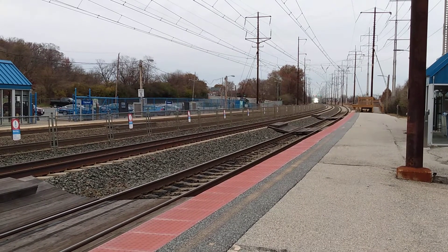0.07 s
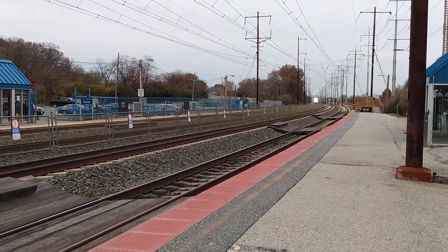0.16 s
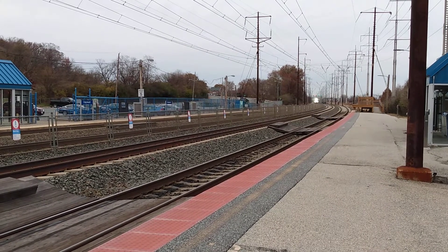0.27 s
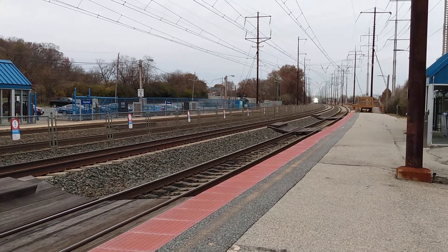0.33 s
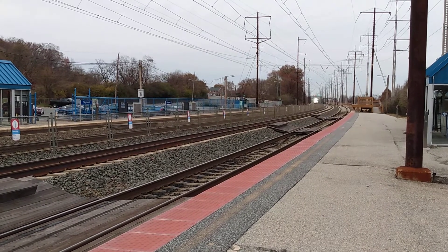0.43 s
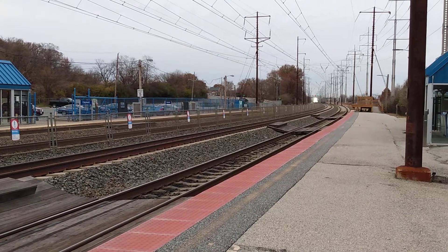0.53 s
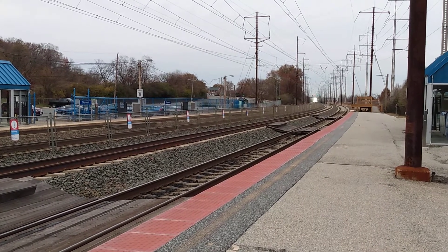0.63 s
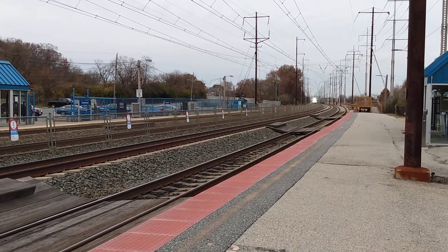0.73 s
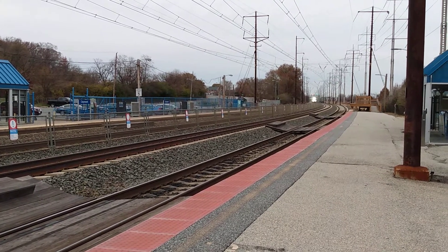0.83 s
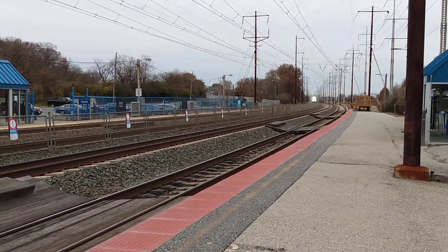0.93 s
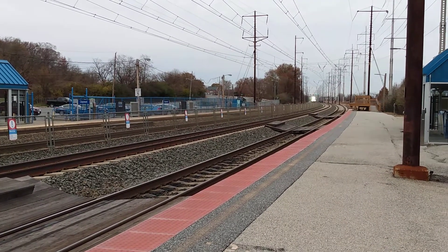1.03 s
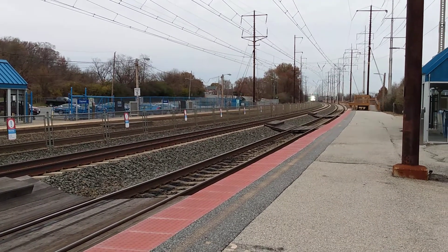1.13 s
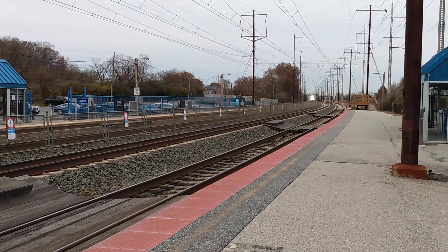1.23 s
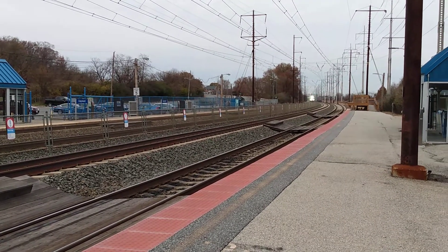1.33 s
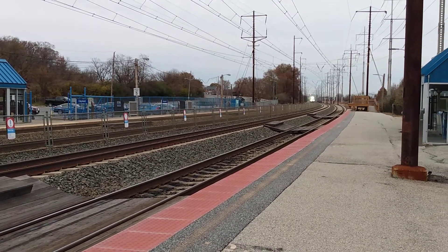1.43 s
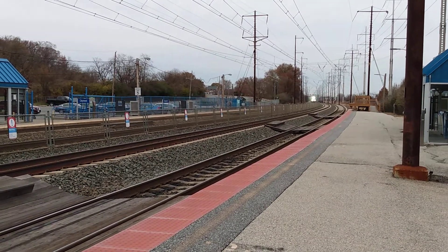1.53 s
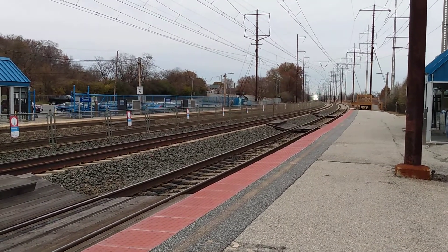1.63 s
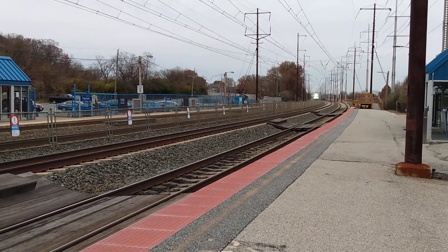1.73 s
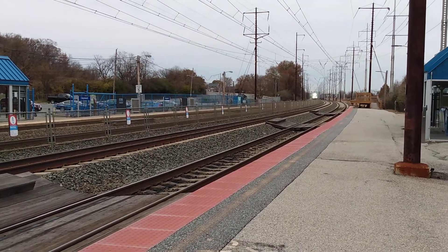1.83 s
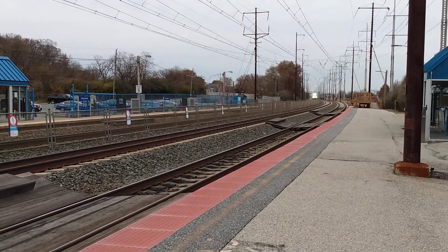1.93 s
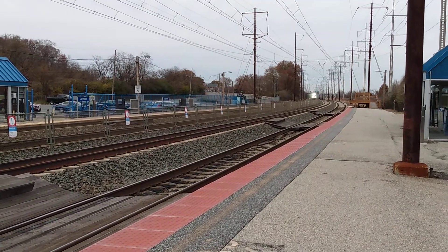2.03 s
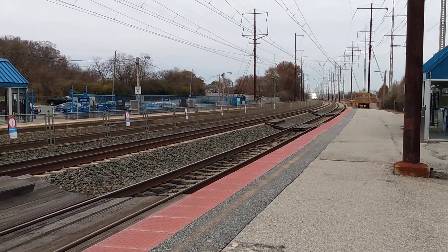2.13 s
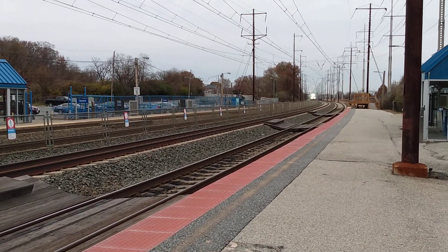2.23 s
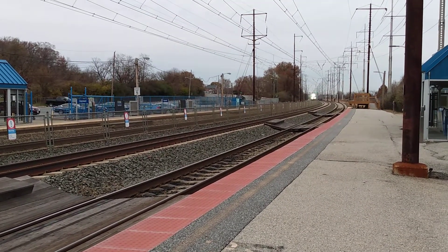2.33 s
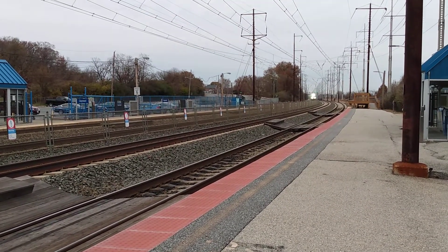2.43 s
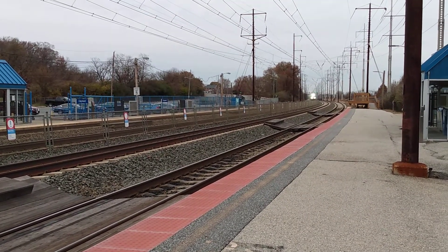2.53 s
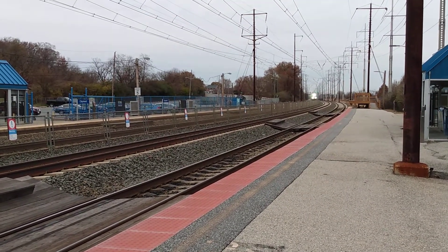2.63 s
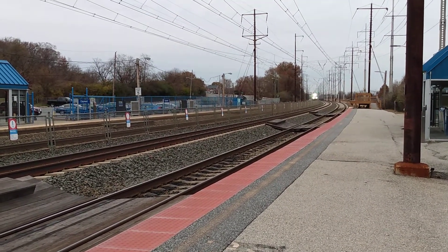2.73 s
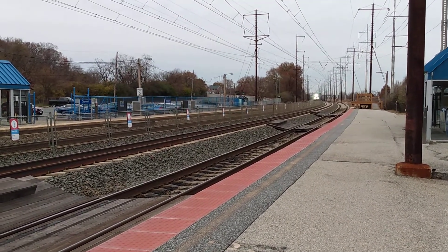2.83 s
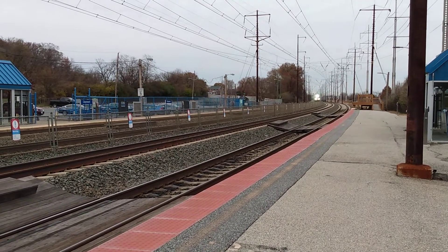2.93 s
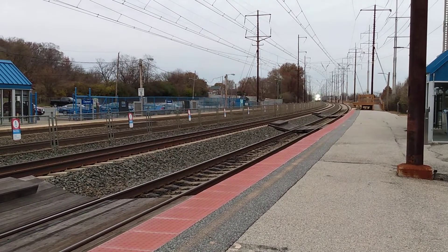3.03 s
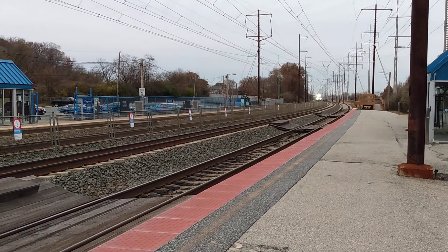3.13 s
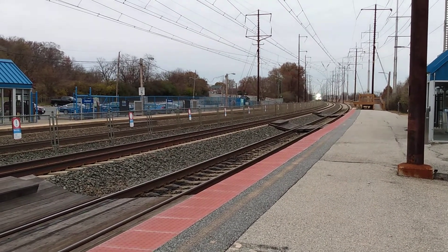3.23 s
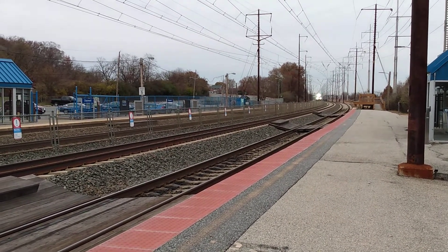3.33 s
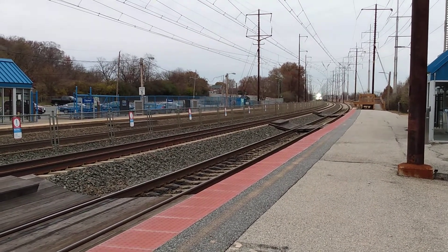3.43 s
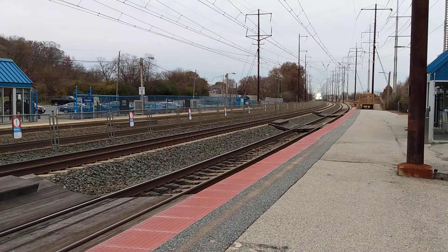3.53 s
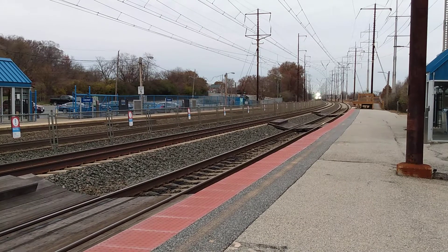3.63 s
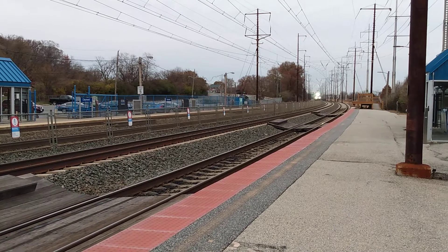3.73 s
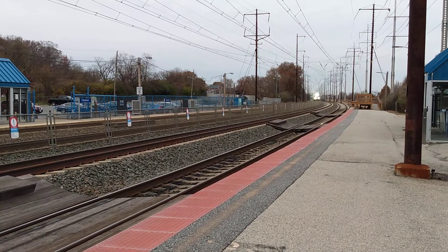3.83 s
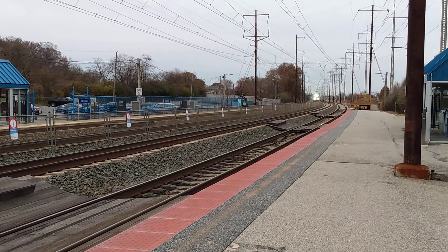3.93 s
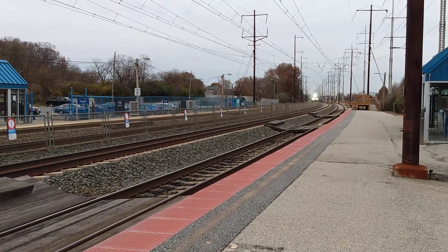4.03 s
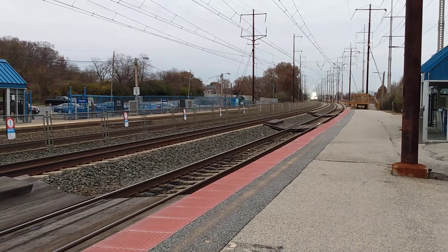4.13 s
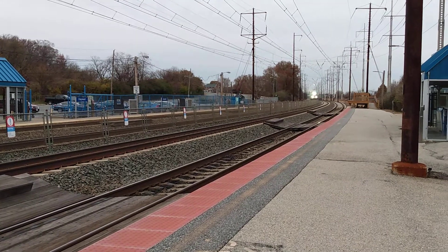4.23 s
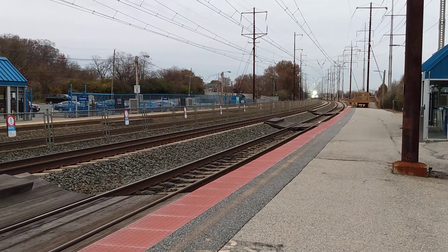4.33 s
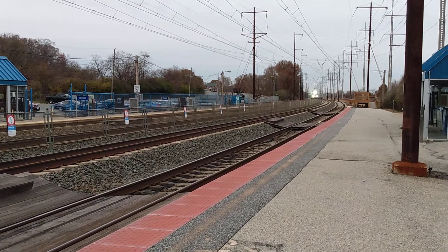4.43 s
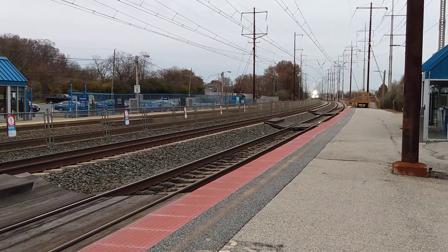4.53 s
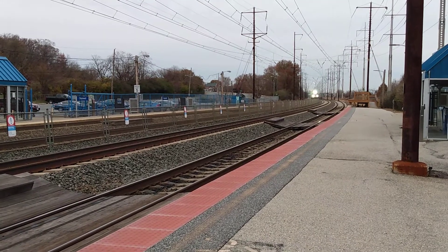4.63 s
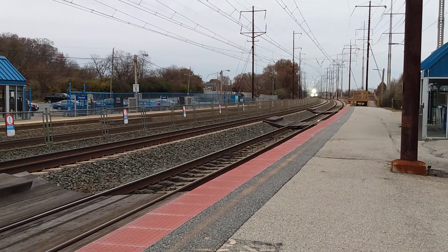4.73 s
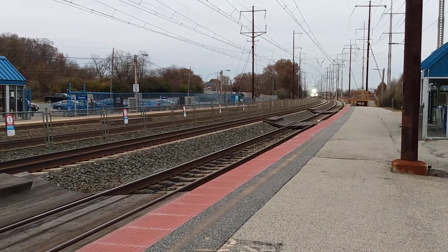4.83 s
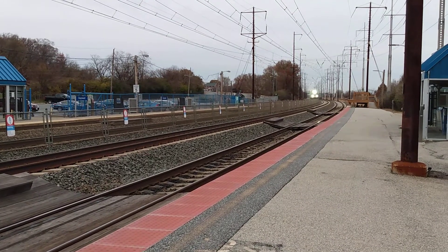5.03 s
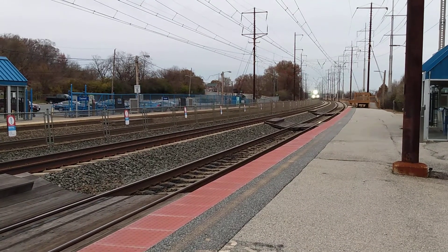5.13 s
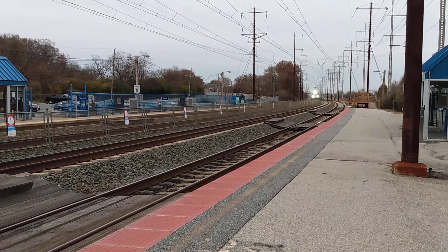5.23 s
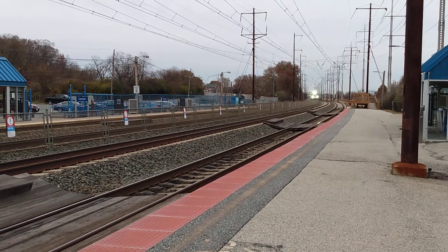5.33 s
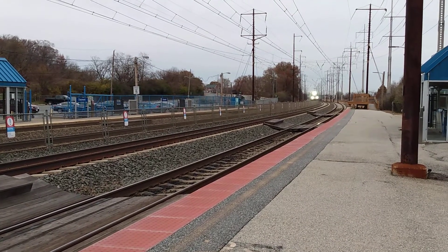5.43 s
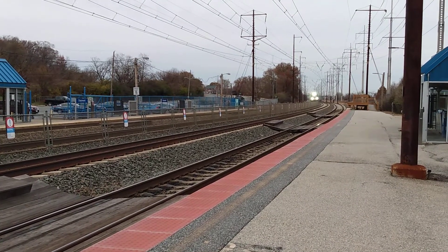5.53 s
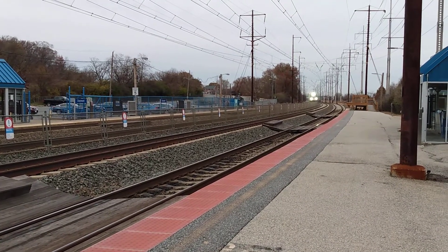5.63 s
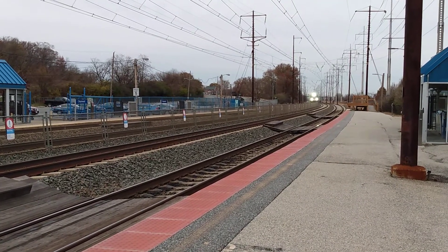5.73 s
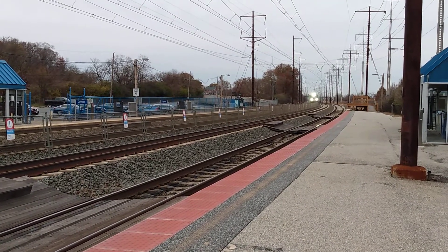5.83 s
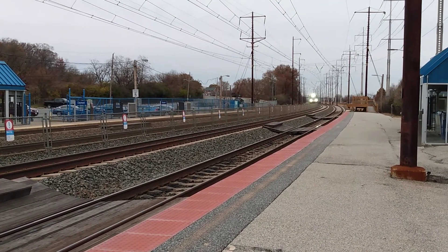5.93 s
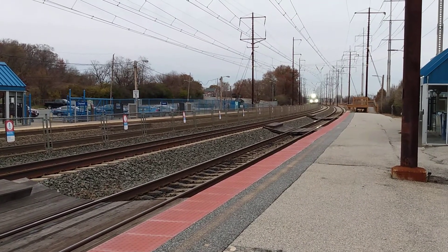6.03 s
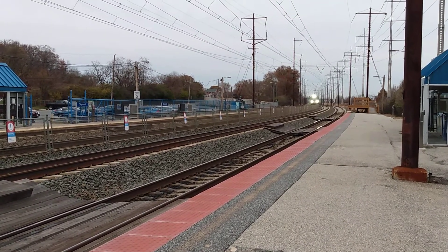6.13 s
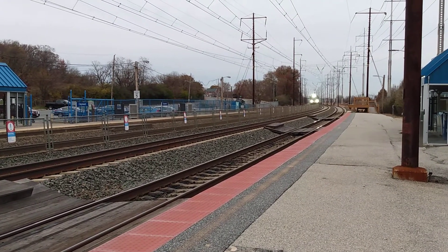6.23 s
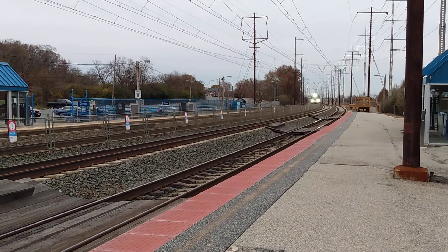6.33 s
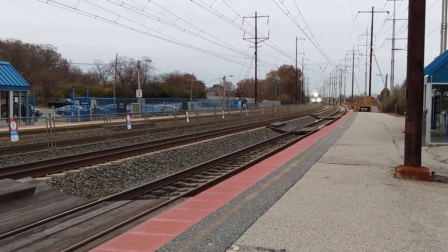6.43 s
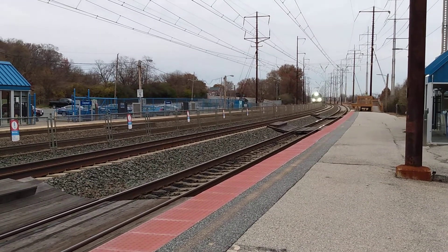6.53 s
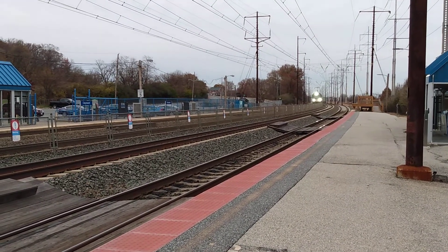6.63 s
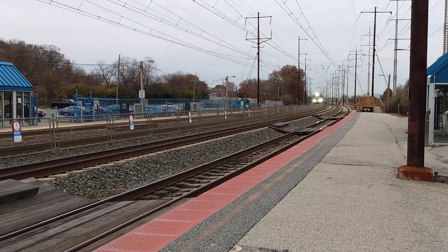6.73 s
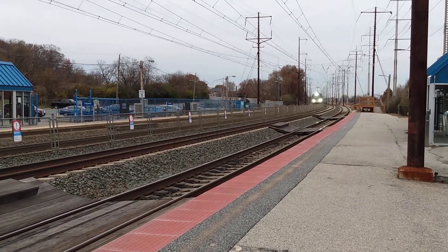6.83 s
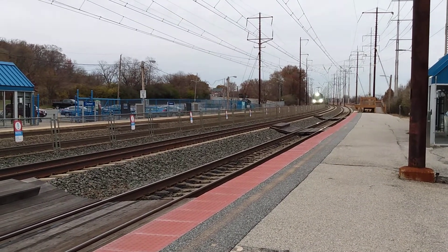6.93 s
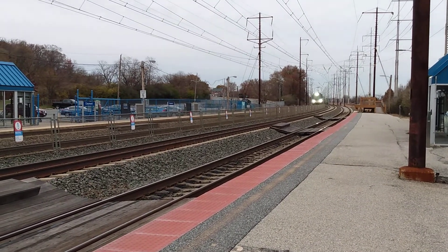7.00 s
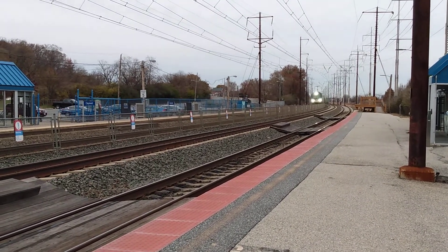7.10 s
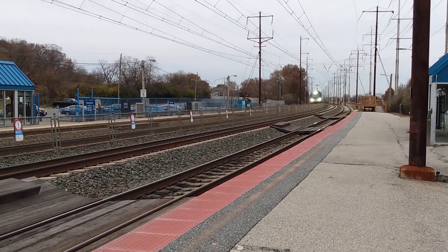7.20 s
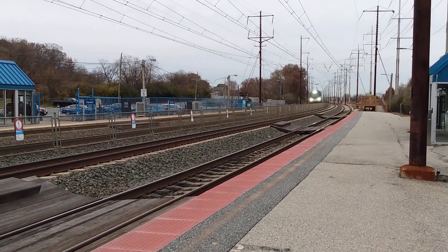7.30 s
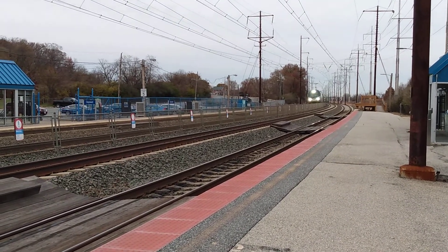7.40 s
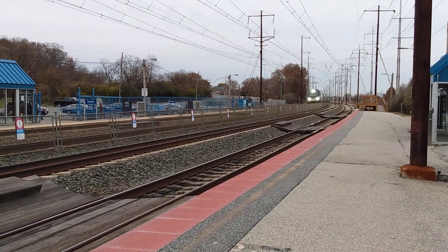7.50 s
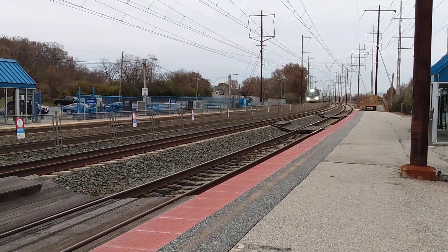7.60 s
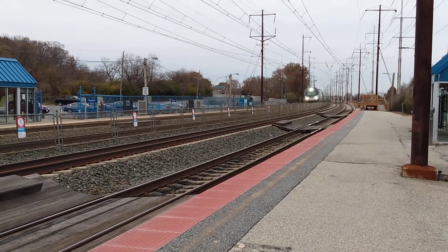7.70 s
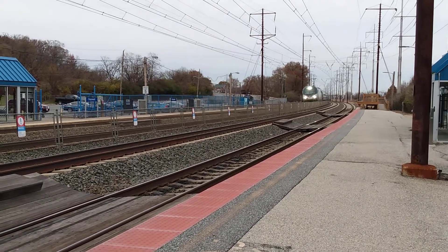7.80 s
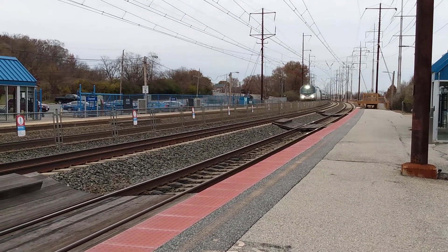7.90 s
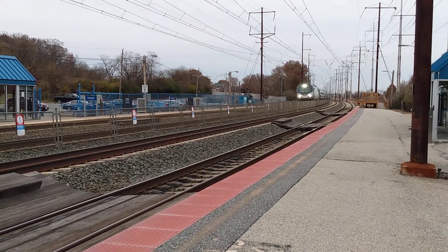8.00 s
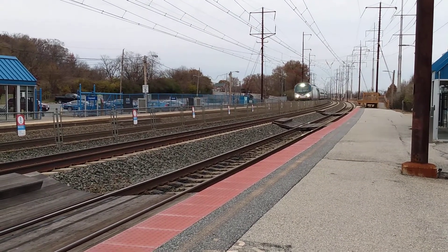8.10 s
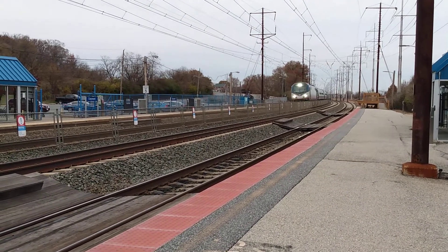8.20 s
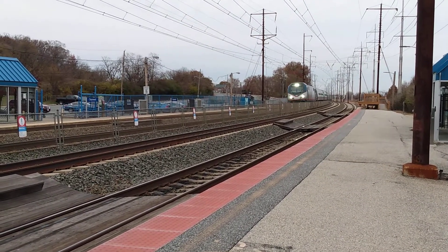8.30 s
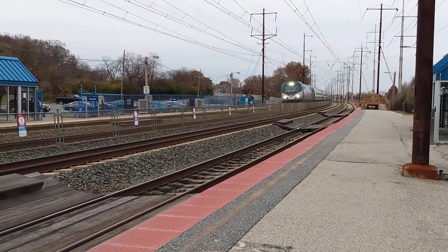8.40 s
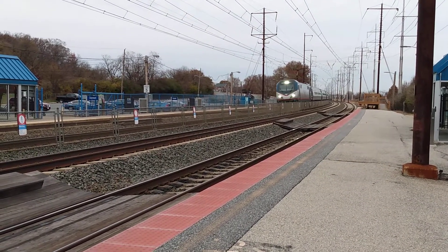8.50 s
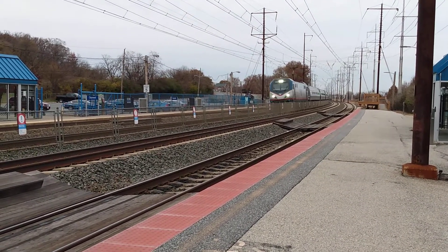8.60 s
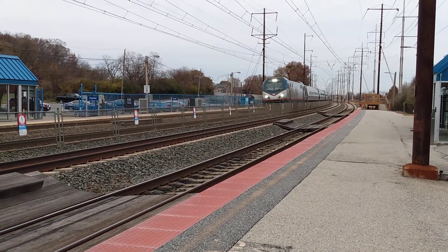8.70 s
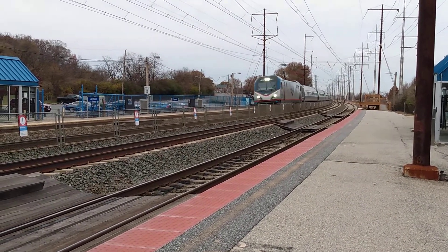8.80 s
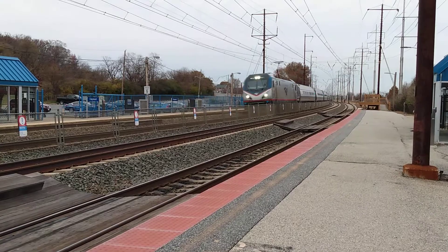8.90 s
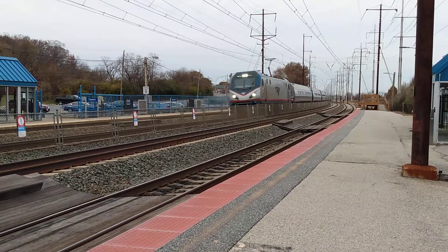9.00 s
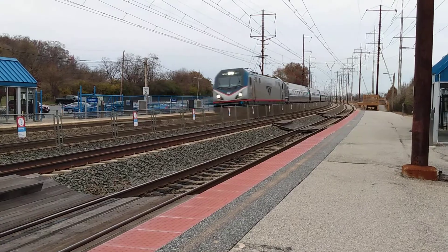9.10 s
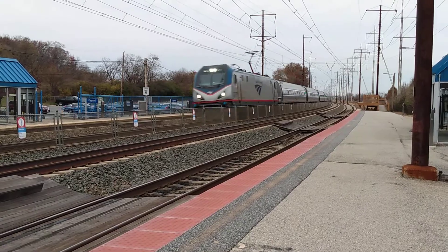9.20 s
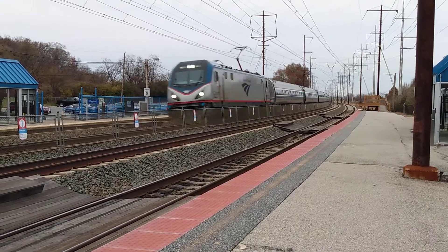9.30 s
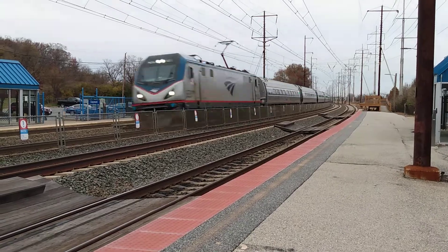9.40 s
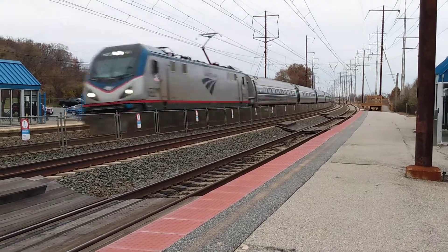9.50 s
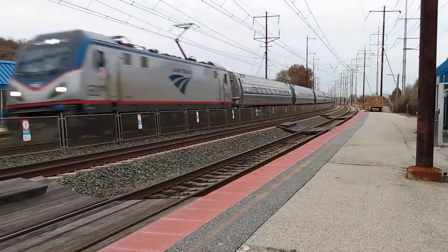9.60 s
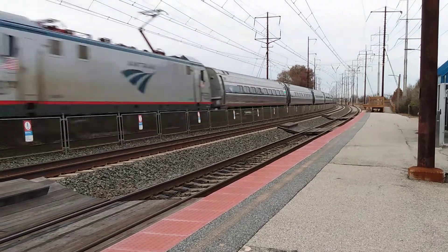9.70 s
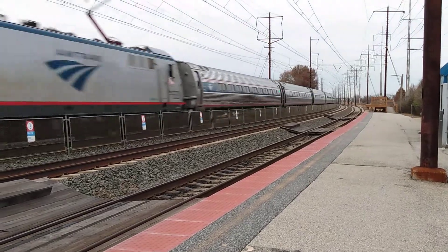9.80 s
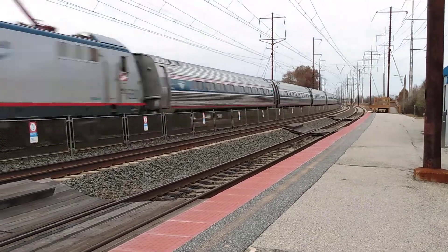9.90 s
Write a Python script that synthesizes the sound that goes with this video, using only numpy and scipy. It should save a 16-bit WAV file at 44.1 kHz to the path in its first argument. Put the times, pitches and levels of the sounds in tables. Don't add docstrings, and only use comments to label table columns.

```python
import sys
import numpy as np
from scipy import signal
from scipy.io import wavfile
from scipy.ndimage import uniform_filter1d

SR = 44100
rng = np.random.default_rng(int(sys.argv[2]) if len(sys.argv) > 2 else 0)


def makeup_ratio(level_db):
    decades = np.asarray(level_db, float) / 20
    return 10 ** decades


def materialize(psi):
    bounded = np.clip(np.atleast_2d(psi).T, -1, 1)
    quanta = np.round(bounded * 32767).astype(np.int16)
    wavfile.write(sys.argv[1], SR, quanta)


N = 438794


def on_hz(table, hz):
    at_hz, *columns = np.transpose(table)
    return np.array([np.interp(np.log(hz + 1), np.log(at_hz + 1), c) for c in columns])


def ramp(hz, edges_hz, values):
    return np.interp(np.log(hz + 1), np.log(edges_hz), values)[:, None]


def bump(t, s, half_s):
    return np.exp(-((t - s) / half_s) ** 2)


def frames(x, size=1024):
    return signal.stft(x, SR, nperseg=size, noverlap=size - size // 4)


def unframe(cells, size=1024):
    return signal.istft(cells, SR, nperseg=size, noverlap=size - size // 4)[1][..., :N]


def walk(shape, wide, long):
    w = rng.standard_normal(shape, dtype=np.float32)
    for _ in range(2):
        w = uniform_filter1d(w, wide, axis=0)
        w = uniform_filter1d(w, long, axis=1)
    return w / w.std()


# hz, traffic_0_to_1, wheels_0_to_1, sizzle_0_to_1
PORTS_ALIKE = [(60, .99, .997, .6), (300, .88, .98, .6), (800, .5, .84, .6), (1500, .35, .65, .6),
               (4000, .15, .3, .5), (14000, .3, .45, .6)]


def noise_source(spectrum, phase, share, patchy_db, burst_db=0., even_hz=SR):
    noise = rng.standard_normal((3, N), dtype=np.float32) * np.float32(np.sqrt(SR / 2))
    hz, t, cells = frames(noise)
    patchy_db = patchy_db * np.where(hz > even_hz, .4, 1)[:, None]
    db = patchy_db * walk(cells[0].shape, wide=5, long=9)
    db = db + burst_db * walk((1, len(t)), wide=1, long=5)
    alike = np.clip(on_hz(PORTS_ALIKE, hz)[share], 0, 1)[:, None]
    turn = np.exp(.5j * np.interp(hz, *np.transpose(phase)))[:, None]
    common = np.sqrt(alike) * np.array([cells[0] * turn, cells[0] / turn])
    ports = common + np.sqrt(1 - alike) * cells[1:]
    return hz, t, ports * makeup_ratio(db + on_hz(spectrum, hz)[:, :, None])


# hz, left_db_per_hz, right_db_per_hz
TRAFFIC = [(30, -82, -84.5), (80, -86, -83.5), (200, -81.5, -82.5), (440, -87, -87.5), (770, -72.5, -79.5),
           (1030, -71.5, -85), (1254, -85, -75), (1790, -87, -69), (2403, -81, -79.5), (2930, -106, -86.5),
           (4620, -101, -89.5), (6050, -104, -99), (7640, -104, -104), (10100, -107, -116)]
# hz, left_lead_radians
TRAFFIC_PHASE = [(0, 0), (1030, 1.9), (1810, 3.8), (2760, 7.9), (4910, 19.9), (6550, 26.7), (7670, 25.6),
                 (8270, 22.8), (11100, 40.2), (11500, 40.5), (12300, 44.9), (13700, 48.0), (15600, 53.7),
                 (16100, 54.1)]
# time_s, level_db
TRAFFIC_FLOW = [
    (0, 0.8),
    (2.1, 1),
    (2.6, -0.24),
    (4.5, -0.4),
    (6.1, 1),
    (7.2, 3),
]
# centre_s, half_length_s, tyre_db, engine_bass_db
PASSING_CARS = [
    (0.898, .15, 2, 2.5),
    (1.25, 0.22, 0, 3),
    (2.045, 0.36, 4, 1),
    (2.9, 0.21, 2, 3),
    (3.793, 0.067, 5.5, 0.2),
    (4.15, 0.057, 4.5, 2),
    (4.837, 0.1, 1.5, 2),
    (5.145, 0.13, 3.5, 1.5),
    (5.7, 0.19, 4.5, 1),
    (6.5, 0.27, -1.5, 6),
]
# centre_s, half_length_s, pitch_hz, half_width_hz, level_db
VEHICLES = [
    (0.21, 0.56, 404, 180, 6.5),
    (1.448, 0.2, 397, 116.6, 5.5),
    (1.798, .05, 1240, 100, 8.5),
    (2.0, 0.099, 1300, 250, 6.5),
    (2.642, 0.073, 273, 69, 8.5),
    (3.05, 0.26, 1250, 200, 4),
    (3.856, 0.14, 900, 120, 2),
    (6.03, 0.23, 300, 130, 5),
    (6.65, 0.27, 620, 110, 7),
    (6.096, 2.7, 2630, 820, 4),
]


def town():
    hz, t, hum = noise_source(TRAFFIC, TRAFFIC_PHASE, share=0, patchy_db=1.6, even_hz=1600)
    tyre_rest_db, tyre_hz = -2, (65, 750, 1500)
    tyre_db = tyre_rest_db + sum(tyre * bump(t, s, half_s) for s, half_s, tyre, _ in PASSING_CARS)
    engine_db = sum(bass * bump(t, s, half_s) for s, half_s, _, bass in PASSING_CARS)
    cars_db = ramp(hz, tyre_hz, [0, 1, 0]) * tyre_db + ramp(hz, tyre_hz, [1, 0, 0]) * engine_db
    breeze_db, breeze_hz, dies_s, fade_s = 9, (1570, 8950), 3.12, 1
    wind_db = -breeze_db / 2 * ramp(hz, breeze_hz, [0, 1]) * np.tanh((t - dies_s) / fade_s)
    vehicles_db = sum(db * np.outer(np.exp(-((hz - pitch_hz) / width_hz) ** 2), bump(t, s, half_s))
                      for s, half_s, pitch_hz, width_hz, db in VEHICLES)
    flow_db = np.interp(t, *np.transpose(TRAFFIC_FLOW))
    return hum * makeup_ratio(flow_db + cars_db + wind_db + vehicles_db)


# start_s, peak_db, top_hz, left_minus_right_db
BIRD_CHIPS = [
    (1.8233, -52, 6980, -9.5),
    (2.8494, -64, 7120, -11.0),
    (4.8519, -51, 7000, -3.5),
    (6.4752, -53, 7070, -4.5),
]


def bird():
    out, t = np.zeros((2, N)), np.arange(SR // 3) / SR
    tail = rng.standard_normal((2, len(t))) * makeup_ratio(-60 * t / 0.29) * makeup_ratio(-17.5)
    tail[:, 0] = 1
    for s, db, top_hz, pan_db in BIRD_CHIPS:
        hz = top_hz * (1.06 - .26 * np.exp(-t / .009))
        rasp = 1 + 3.5 * uniform_filter1d(rng.standard_normal(len(t)), size=20)
        envelope = (1 - np.exp(-t / .002)) * np.exp(-t / .022)
        chip = rasp * np.sin(2 * np.pi * np.cumsum(hz) / SR) * envelope
        heard = signal.fftconvolve(chip[None], tail, axes=1)[:, :len(t)]
        i = int((s - .004) * SR)
        out[:, i:i + len(t)] += heard * makeup_ratio(db - 11.0 + np.array([[pan_db], [-pan_db]]) / 2)
    return out


# start_s, peak_db, left_minus_right_db
FITTING_TICKS = [
    (5.579, -45, -3),
    (7.876, -24.5, -3),
]


def ticks():
    out, t = np.zeros((2, N)), np.arange(SR // 30) / SR
    bright = signal.butter(2, [2500, 8500], "band", fs=SR, output="sos")
    for s, db, pan_db in FITTING_TICKS:
        click = signal.sosfilt(bright, rng.standard_normal(len(t)) * np.exp(-t / 0.0038))
        i = int(s * SR)
        out[:, i:i + len(t)] += click * makeup_ratio(db - 4.0 + np.array([[pan_db], [-pan_db]]) / 2)
    return out


# hz, left_db_per_hz, right_db_per_hz
RAIL_SIZZLE = [(5940, -86, -90), (7900, -90.5, -84.5), (9430, -73.5, -80.5), (10370, -70.5, -71.5),
               (11120, -68.5, -72.5), (12750, -65, -63), (13500, -65, -64), (14200, -69, -62.5),
               (15000, -68, -67.5), (15800, -88, -68)]
# hz, left_lead_radians
RAIL_SIZZLE_PHASE = [(0, 0), (690, -0.5), (2670, -7.2), (3880, -0.5), (4390, -2.6), (5770, -1.5),
                     (6460, -3.0), (7490, 3.2), (8440, 1.2), (9130, 3.6), (10800, 8.7), (13700, 16.1),
                     (15400, 22.1), (16100, 22.2)]
# time_s, level_db
SIZZLE_RISE = [(0, -75), (2.0, -68), (3.1, -65), (4.6, -63), (5.8, -54), (6.5, -51.5), (7.4, -42.5),
               (8.0, -32.5), (8.7, -33.5), (9.5, -30), (9.8, -34.5), (9.95, -43)]
# start_s, hold_s, level_db
SIZZLE_BURSTS = [(0, .08, 7), (.38, .06, 8), (0.632, .03, 7), (.88, .14, 8), (1.196, 0.097, 9),
                 (2.27, 0.64, 5), (3.274, 0.44, 8.5), (3.933, 0.58, 7.5), (4.7, .25, 11.5), (5.22, .04, 4),
                 (5.36, 0.25, 6.5), (6.113, 0.14, 8), (6.57, .03, 0), (6.844, 0.091, 4.5), (7.122, 0.15, 4),
                 (7.6, 0.13, 4), (7.86, 0.31, 3.5), (8.287, 0.02, 5), (8.414, 0.051, 0.5),
                 (8.776, 0.36, 2.5), (9.136, 0.066, 2), (9.35, 0.024, 1), (9.487, 0.054, 1.5)]


def sizzle():
    hz, t, hiss = noise_source(RAIL_SIZZLE, RAIL_SIZZLE_PHASE, share=2, patchy_db=2.5, burst_db=1.4)
    growth_db = np.interp(t, *np.transpose(SIZZLE_RISE)) + 31
    burst_db, attack_s, release_s = 0, 0.027, 0.066
    for s, hold_s, db in SIZZLE_BURSTS:
        slope_s = np.where(t < s, attack_s, release_s)
        burst_db = burst_db + db * bump(t, np.clip(t, s, s + hold_s), slope_s)
    edge_hz = (10050, 13670)
    db = ramp(hz, edge_hz, [1.255, 1]) * growth_db + ramp(hz, edge_hz, [0.38, 1]) * burst_db
    low_cut_db = 30 * np.log2(np.maximum(6000 / (hz[:, None] + 50), 1))
    return hiss * makeup_ratio(db - low_cut_db)


# hz, left_db_per_hz, right_db_per_hz
WHEEL_ROAR = [(30, -55, -72), (82, -52.5, -51.5), (180, -48.5, -49), (430, -58.5, -57.5),
              (634, -47.5, -47.5), (1087, -51.5, -49.5), (1591, -44, -37.5), (1923, -55, -47.5),
              (2320, -56, -58), (2780, -57, -60), (3530, -61.5, -54), (5000, -66.5, -57.5),
              (6400, -65.5, -64.5), (9600, -65.5, -70)]
# hz, left_lead_radians
WHEEL_PHASE = [(0, 0), (1100, .3), (1460, 2.7), (2240, 4.5), (3000, 8), (8000, 17), (16000, 35)]
# pitch_hz, width_hz, far_db, near_db
WHEEL_RINGS = [(86, 14, 4.5, 6.5), (186, 39, -1, 6), (300, 130, 7, 4.5), (366, 42, 8.5, 8),
               (698, 31, 2, 3.5), (1432, 62, 8, -0.5), (1480, 88, 1.5, 3.5), (1760, 350, -3, 0.4),
               (2640, 490, 6, 0), (3060, 83, -3, 6.5), (3280, 360, -4.5, -1), (4600, 510, -0.5, 4.5)]
# hz, ground_db_per_100_m, bend_db_per_100_m
WAY_LOSS = [(200, 10, 68), (750, 8, 22), (1430, 4.5, -1), (2500, 9, 7.5)]
# centre_s, level_db
JOINT_THUDS = [
    (7.3, -1),
    (7.52, 1),
    (7.8, 1.5),
    (8.21, 8.5),
    (8.8, 5),
    (9.04, -2),
    (9.38, 2.5),
    (9.62, 4),
]


def wheels():
    hz, t, roar = noise_source(WHEEL_ROAR, WHEEL_PHASE, share=1, patchy_db=0.4, burst_db=0.62)
    speed_m_s, arrives_s, track_m = 46.03, 9.506, 13.06
    metres = np.hypot(speed_m_s * np.maximum(arrives_s - t, 0), track_m)
    ground_db, bend_db = on_hz(WAY_LOSS, hz)[:, :, None] / 100
    loss_db = 21 * np.log10(metres / track_m)
    loss_db = loss_db + ground_db * (metres - track_m)
    loss_db = loss_db + bend_db * np.maximum(metres - 101.3, 0)
    loss_db = loss_db + 41 / 100 * np.maximum(metres - 200, 0)
    thud_db = ramp(hz, (200, 590), [1, 0]) * sum(db * bump(t, s, 0.032) for s, db in JOINT_THUDS)
    near = np.interp(t, [8.3, 9.2], [0, 1])
    rings_db = sum(np.outer(1 / (1 + (2 * (hz - pitch_hz) / width_hz) ** 2), far_db + near * (near_db - far_db))
                   for pitch_hz, width_hz, far_db, near_db in WHEEL_RINGS)
    air_db = -7 * np.log2(np.maximum(hz[:, None] / 9500, 1))
    return roar * makeup_ratio(rings_db + thud_db - loss_db + air_db - 1.4)


def scene():
    return unframe(town() + wheels() + sizzle()) + bird() + ticks()


def patch_db(cells, hz, wide, long):
    power = uniform_filter1d(np.abs(cells) ** 2, long, axis=2)
    power = uniform_filter1d(power, wide, axis=1)
    return 10 * np.log10(power * 2 / (1.5 * hz[1]) + 1e-20)


def under(db, threshold_db, knee_db):
    return .5 - .5 * np.tanh((db - threshold_db) / knee_db)


def roll_off(x):
    return signal.sosfilt(signal.butter(12, 16530, fs=SR, output="sos"), x)


# hz, left_threshold_over_traffic_db, right_threshold_over_traffic_db, depth_db
NOISE_GATE = [(30, -20, -23, 8.1), (130, 5, 5.5, 9.7), (250, 6.5, 6, 12.7), (452, 7, 5.5, 15),
              (865, 1, 7.5, 9.4), (1040, -5, 8, 12), (1073, 2.5, 6, 9.8), (1384, 12.5, 8, 18.2),
              (1618, 11.5, 1, 8.9), (1950, 1.5, -37, 34), (2480, 8.5, 3.5, 5.7), (3000, 0, -14, 20)]
# hz, threshold_db
FAINT_LIMIT = [(1500, -53), (3000, -39), (6000, -28.5), (9000, -30.5), (11000, -26), (12500, -31),
               (16000, -38)]


def record(dry):
    rounded = dry / (1 + (dry / 1.02) ** 8) ** (1 / 8)
    hz, t, cells = frames(rounded.astype(np.float32))
    left_db, right_db, depth_db = on_hz(NOISE_GATE, hz)
    threshold_db = on_hz(TRAFFIC, hz) + [left_db, right_db]
    shut = under(patch_db(cells, hz, wide=3, long=7), threshold_db[:, :, None], knee_db=1.23)
    cells = cells * makeup_ratio(-depth_db[:, None] * uniform_filter1d(shut, size=3, axis=2))
    loudest_db = patch_db(cells, hz, wide=9, long=15).max(axis=(0, 1))
    loudest_db = np.minimum(loudest_db, -46)
    limit_db = on_hz(FAINT_LIMIT, hz).T + 2.8 * walk(cells[0].shape, wide=3, long=50)
    masked = under(patch_db(cells, hz, wide=3, long=9), loudest_db + limit_db, knee_db=3.5)
    cells = cells * makeup_ratio(-24 * masked) * (hz < 15900)[:, None]
    low_cut = signal.butter(3, 50, "high", fs=SR, output="sos")
    mix = signal.sosfilt(low_cut, unframe(cells))
    return roll_off(mix)


dry = scene()
out = record(dry)
materialize(out)
```